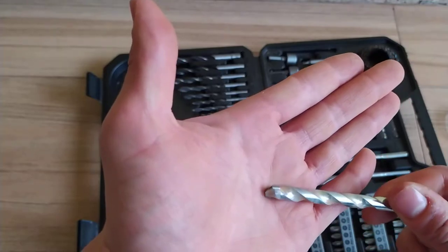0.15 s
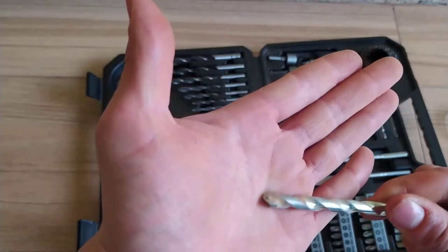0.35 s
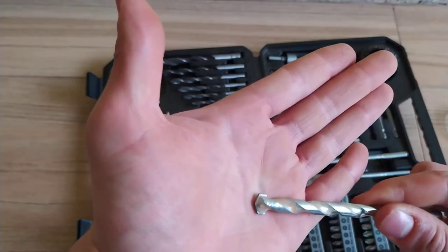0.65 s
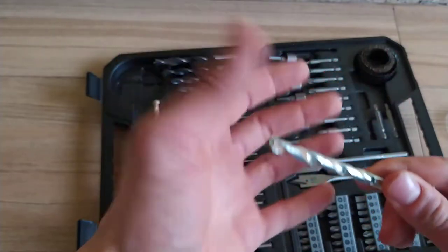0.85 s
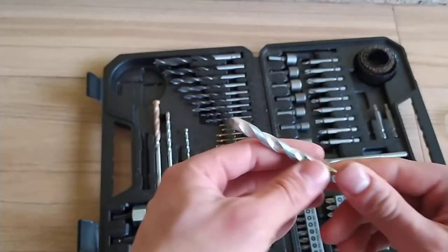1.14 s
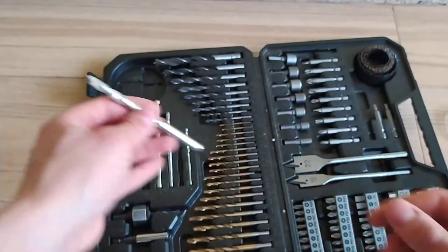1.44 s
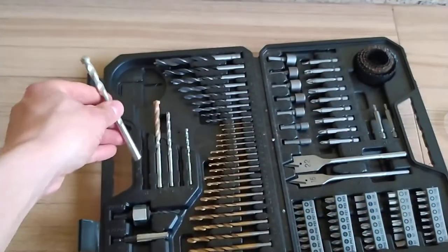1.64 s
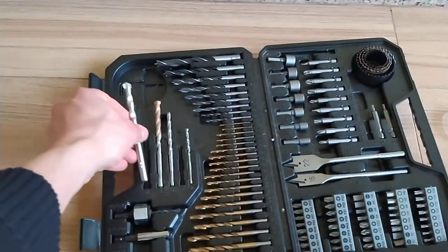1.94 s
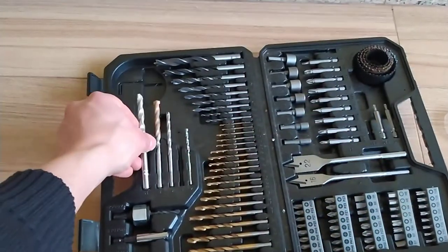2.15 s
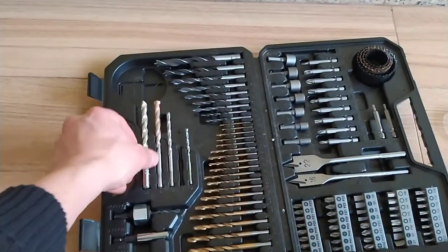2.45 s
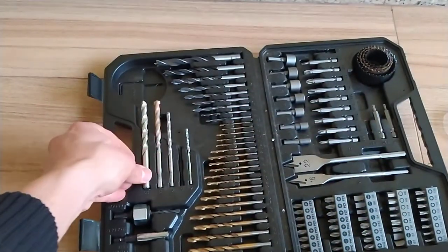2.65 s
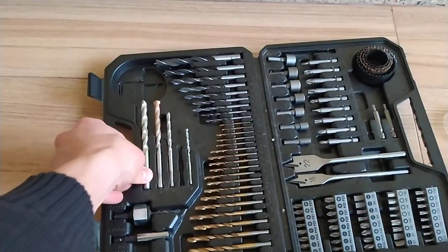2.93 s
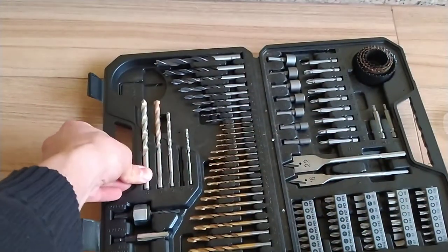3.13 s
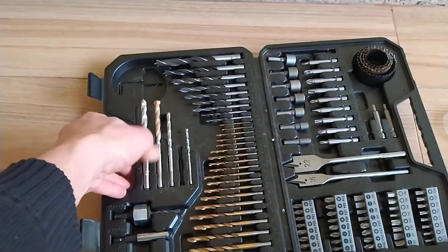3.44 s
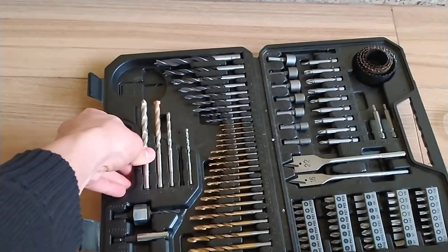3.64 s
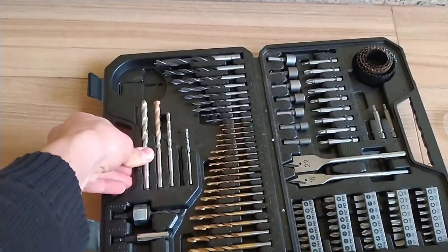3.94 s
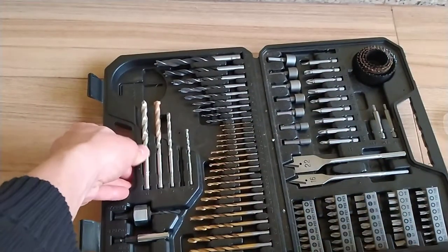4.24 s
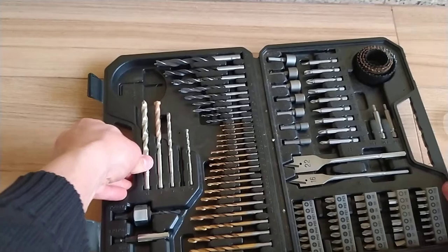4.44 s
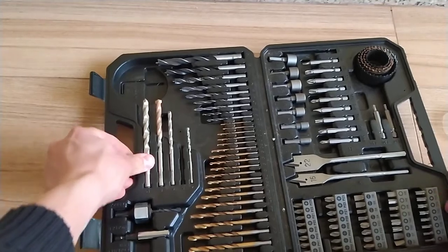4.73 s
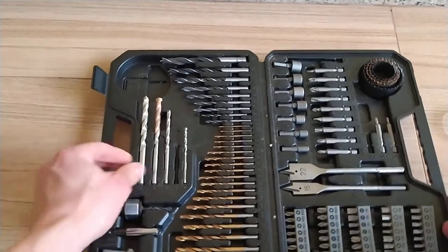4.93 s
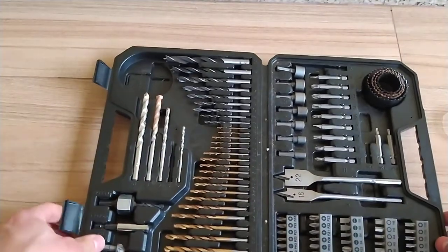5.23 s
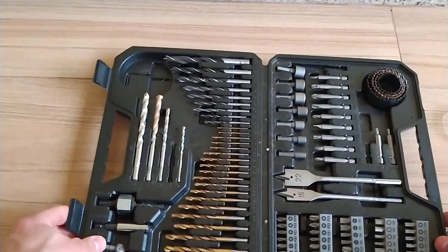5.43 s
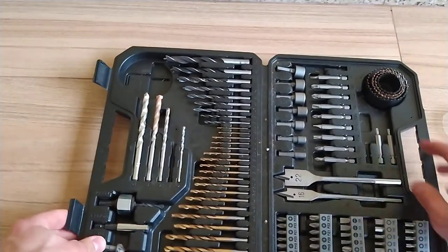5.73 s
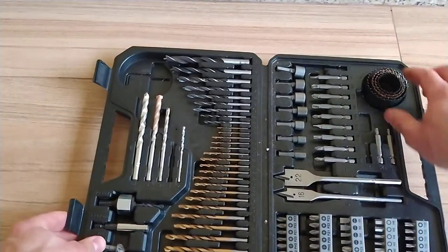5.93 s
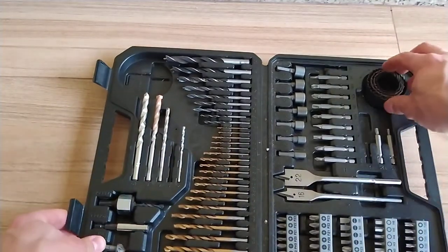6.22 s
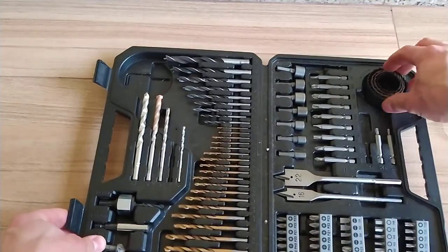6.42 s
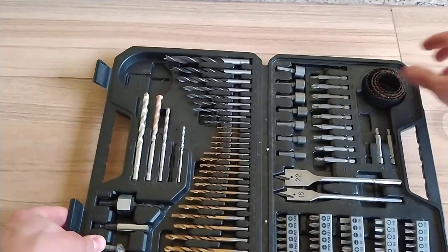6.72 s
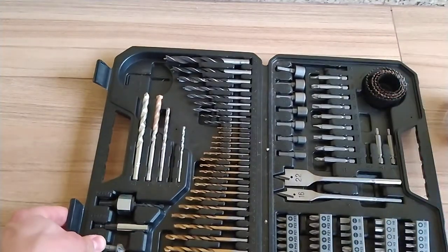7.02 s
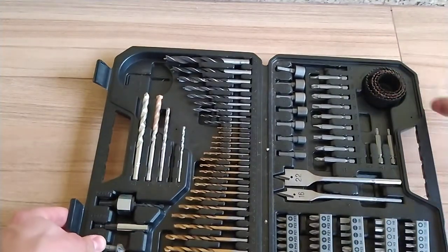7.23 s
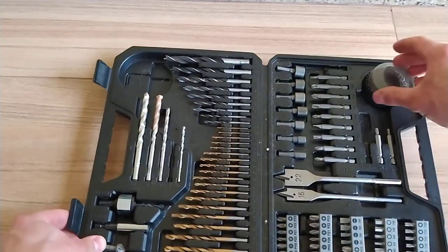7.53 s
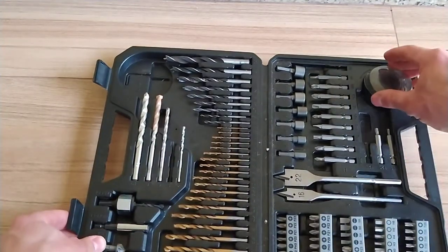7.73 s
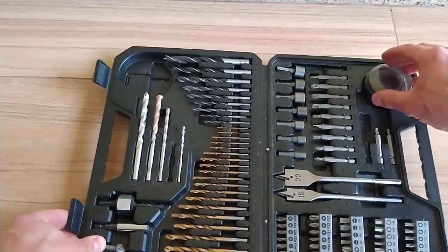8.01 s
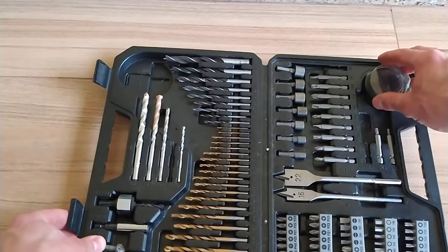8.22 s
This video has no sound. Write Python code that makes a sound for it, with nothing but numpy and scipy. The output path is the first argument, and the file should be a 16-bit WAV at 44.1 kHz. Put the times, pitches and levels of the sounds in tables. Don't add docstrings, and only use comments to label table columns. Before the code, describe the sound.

Quiet room hum, faint finger rubbing, two hollow knocks, one sharp plastic snap, a short drag with nail ticks, then small cap clicks.

```python
import sys
import numpy as np
from scipy import signal
from scipy.fft import rfft, irfft, next_fast_len
from scipy.io import wavfile

SR = 44100
rng = np.random.default_rng(int(sys.argv[2]) if len(sys.argv) > 2 else 0)


def invert_db(x):
    u = np.asarray(x, float) / 20
    return 10 ** u


def transcribe(signal):
    frames = np.atleast_2d(signal).T
    limited = np.clip(frames, -1, 1)
    pcm = np.round(limited * 32767).astype(np.int16)
    wavfile.write(sys.argv[1], SR, pcm)


N = 369116

# freq_hz, density_db_per_hz
HUM_SPECTRUM = [(12, -25), (20, 0), (40, -5), (65, -7), (105, -13), (157, -8), (200, -16), (250, -8),
                (295, -17), (345, -14), (480, -21), (770, -27), (1500, -36), (2500, -60)]
# freq_hz, density_db_per_hz
HISS_SPECTRUM = [(700, -1.5), (1400, -1.5), (2300, -1), (4300, -7.5), (5400, -7.5), (5850, 3), (6300, -5.5),
                 (7600, -9), (9500, -3), (11000, -6.5), (12000, -15), (15500, -15.5), (16500, -49.5)]
# freq_hz, likeness (-1..1)
PORT_LIKENESS = [(60, 0.7), (180, 0.98), (550, 0.4), (1650, -0.41), (4970, 0.038), (15000, -0.066)]
HUM_DB, HISS_DB, HUM_PAN_DB = -54.5, -67.5, 1.3

# start_s, length_s, hiss_db, scrape_db
STROKES = [(.75, 0.73, -67.5, -85), (2.23, 0.51, -63, -64), (2.77, 0.11, -56.5, -64.5),
           (3.297, 0.25, -59, -68.5), (3.455, 0.026, -48, -73), (3.779, 0.16, -65.5, -69),
           (4.159, 0.11, -57, -65.5), (4.246, 0.067, -55, -60), (4.604, 0.12, -46.5, -55.5),
           (4.7, 0.065, -52, -62.5), (4.768, 0.42, -38, -49), (5.24, 0.2, -60, -65),
           (5.536, 0.3, -61, -70.5), (5.795, 0.13, -53, -66), (6.216, 0.11, -47.5, -52),
           (6.348, 0.044, -56, -60), (6.411, 0.17, -46.5, -58.5), (6.646, 0.063, -55.5, -66.5),
           (7.029, 0.06, -58, -82), (7.553, 0.098, -63, -68.5), (7.868, 0.13, -61, -59),
           (8.027, 0.19, -83, -63.5), (8.173, 0.23, -61, -62.5)]
# time_s, left_minus_right_db
STROKE_PAN = [(0, -2.5), (4, 0.5), (4.7, 1), (5.2, 1.5), (5.8, 2), (6.3, 1.5), (6.6, 1.5), (7.5, -1),
              (8.3, 4.5)]
# freq_hz, density_db_per_hz
BRIGHT_SPECTRUM = [(2000, -38), (3500, -10.5), (5300, -8.5), (6500, -8.5), (8500, -1.5), (10400, -0.5),
                   (11500, -7), (12500, -15.5), (15000, -14.5), (16500, -38.5)]
# freq_hz, density_db_per_hz
CASE_SCRAPE_SPECTRUM = [(150, -45.5), (250, -24), (347, -16), (529, -15), (1130, -14), (1310, -15.5),
                        (2400, -15), (4500, -29.5), (5850, -50), (9900, -120)]
# freq_hz, density_db_per_hz
CAP_SCRAPE_SPECTRUM = [(700, -4), (1050, -3.5), (1250, 5), (1450, 3), (1700, -4), (2100, -16), (2600, -10),
                       (5000, -38.5)]
PRESS_SHARE, RELEASE_SHARE, LIGHT_DB = 0.17, 0.28, -21.5
FIDGET_FROM_S, FIDGET_HISS_DB, FIDGET_SCRAPE_DB = 1.7, -71, -77.5
CAP_FROM_S, CONTROL_STEP_SAMPLES = 7.04, 32

# time_s, wall_db, crack_db, left_minus_right_db
TICKS = [(1.529, -62.5, -63, -2), (2.802, -75, -58, 5), (2.812, -73, -51, 7), (3.463, -77, -49.5, 17),
         (3.584, -63.5, -62, -2.5), (4.259, -76, -54, -3), (4.869, -45, -31.5, -3.5), (5.125, -53, -41, 0),
         (5.28, -66, -58, -2), (6.122, -51, -60.5, -3), (6.212, -79, -55, 8.5), (6.233, -56, -44, 2),
         (6.247, -59, -48, 5), (6.253, -63, -42.5, -2), (6.285, -68, -59, -3), (6.372, -70, -52, -5),
         (6.415, -76, -53, 0), (6.483, -50, -33.5, 5), (6.498, -64, -50, 0), (6.612, -59.5, -49.5, 15),
         (6.706, -68, -55, 2)]
# time_s, level_db, left_minus_right_db
PLUCKS = [(4.259, -50, -21), (4.272, -58, -10), (6.123, -49.5, 3), (6.247, -44, 13), (6.285, -50, -1),
          (6.46, -49, 1)]
# time_s, level_db, left_minus_right_db
DRAG_SLIPS = [(4.955, -46, -1), (4.985, -59, -3), (5.03, -53, 0), (5.065, -53, -3), (5.1, -57, -3)]
# time_s, level_db, left_minus_right_db
FLICKS = [(5.2095, -36, 3), (5.2115, -41, 0), (6.4835, -44, 1), (6.6135, -54, 5), (7.9235, -50, 3)]
# freq_hz, density_db_per_hz
FLICK_SPECTRUM = [(800, -14), (2000, -5), (6000, -9), (9000, -3), (12000, 0), (16000, 7), (17200, -40)]
# freq_hz, density_db_per_hz
SHARP_SPECTRUM = [(2000, -47), (3500, -21), (5300, -9), (6500, -12.5), (8500, -0.5), (10400, -0.5),
                  (11500, -11), (12500, -15.5), (15000, -12), (16600, -19), (17200, -42.5)]
# freq_hz, density_db_per_hz
WALL_SPECTRUM = [(400, -32), (800, -3), (1200, -1.5), (2000, 2), (2600, 0), (3500, -7), (5000, -16.5),
                 (7000, -34.5)]
# freq_hz, level_db, t60_s
CLIP_MODES = [(870, -10, 0.02), (1150, -2.5, 0.031), (1430, -5, .03)]
TICK_T60_S, CRACK_RISE_S = 0.012, 0.0004

# time_s, shell_db, panel_db, wall_db, crack_db
KNOCKS = [(1.9909, -41.5, -44, -33.5, -46.5), (1.997, -40.5, -38, -60, -64), (2.008, -49, -46.5, -62, -58),
          (2.029, -48, -42.5, -57, -53), (2.045, -42, -46.5, -67, -60), (2.055, -41.5, -49.5, -64, -57),
          (2.1663, -41, -39, -54, -53.5), (2.184, -48.5, -45.5, -75, -74),
          (2.322, -44.5, -56, -36.5, -29.5), (2.3265, -21, -33.5, -30.5, -41),
          (2.331, -45, -36.5, -37, -50), (2.3575, -32, -38, -42.5, -67.5), (2.384, -55.5, -37.5, -57, -65),
          (2.4057, -36.5, -53, -60, -70)]
# time_s, level_db, left_minus_right_db
THUDS = [
    (2.045, -50, 0),
    (2.075, -49, 0),
    (2.172, -52.5, 0),
    (2.36, -47.5, 0),
]
# freq_hz, level_db, t60_s
SHELL_MODES = [(200, -15.5, 0.058), (231, -10.5, 0.08), (283, -4, 0.13), (324.2, -4, 0.51),
               (335, -3.5, 0.15), (370, -19, 0.027), (415, -20.5, .05)]
# freq_hz, level_db, t60_s
PANEL_MODES = [(465, -4.5, 0.084), (510, -9, .08), (611, 4.5, 0.05), (702, 0, 0.017), (743, -3, 0.035),
               (810, -19, 0.019), (990, -0.5, 0.034), (1106, -6.5, 0.065)]
# freq_hz, level_db, t60_s
HELD_BIT_MODES = [(1465, 4.5, 0.0064), (3070, -3, 0.018)]
# freq_hz, level_db, t60_s
BOARD_MODES = [(135, 5.5, 0.14), (165, -7, 0.057)]
# freq_hz, density_db_per_hz
RATTLE_SPECTRUM = [(2000, -37.5), (3500, -15), (5300, -4.5), (6500, -8.5), (8500, -2.5), (10600, -9),
                   (11400, -9), (12300, -26)]
KNOCK_PAN_DB, SHELL_LAG_S = 0.5, 0.00247

# time_s, body_db, wall_db, crack_db, left_minus_right_db
SNAP = [
    (2.9952, -60, -45, -44, -6),
    (2.9961, -39, -17, -10, 2.5),
    (2.9971, -42, -26.5, -19.5, 3.5),
    (2.9985, -36.5, -34, -24, -4.5),
    (3.001, -31, -27, -21.5, 0.5),
    (3.011, -33, -52.5, -25.5, -5.5),
    (3.015, -43, -47, -30.5, 2),
    (3.022, -36.5, -41, -35.5, -15.5),
]
# time_s, level_db, left_minus_right_db
STEEL_BLOWS = [
    (2.9965, -23, -12),
    (3.002, -46, 1.5),
]
# freq_hz, level_db, t60_s
DAMPED_SHELL_MODES = [(185, -3, 0.18), (279, -10.5, 0.073), (337, 2, 0.069), (420, 0, 0.12),
                      (458, -3.5, 0.077), (604, 7, 0.032), (687, 0, 0.037), (761, 2, 0.027),
                      (816, -4, 0.05), (920, -7, 0.025), (1054, 0, .03)]
# freq_hz, level_db, t60_s
STEEL_MODES = [(2110, -15, .04), (2345, 6, .04), (5230, -3, 0.0442), (4900, -7, 0.054), (6250, -1, 0.054),
               (8400, -12, 0.067), (9400, -1.5, 0.0825), (9555, -6.5, 0.086)]

# time_s, level_db, left_minus_right_db
CAP_LIFT = [(7.045, -51, 4), (7.051, -54, 7), (7.058, -56, -11), (7.066, -57.5, 0), (7.075, -55.5, 5),
            (7.084, -61, -1)]
# time_s, hollow_db, wall_db, crack_db, left_minus_right_db
CAP_HITS = [(7.592, -72, -73, -58, 0), (7.6295, -45, -52, -70, 5), (7.638, -42.5, -58, -61, 1),
            (7.645, -55, -50, -39.5, 17), (7.6505, -40, -40.5, -36, 2), (7.656, -58, -47, -48, 0),
            (7.7235, -47, -62, -55, 1), (7.783, -64, -75, -68, 4), (7.882, -58, -76, -64, 2),
            (7.89, -66, -72, -54, 3), (7.912, -57, -64, -62, 1), (7.923, -55, -64, -43.5, 3),
            (7.928, -56, -67, -50, 0), (7.954, -57, -58, -52, 0), (7.998, -57, -56, -45, 14),
            (8.011, -49, -58, -52, 0), (8.031, -58, -46.5, -30, -15), (8.047, -69, -51, -41, 13),
            (8.085, -57, -56, -54, 9), (8.114, -58, -66, -64, 3), (8.212, -54, -59, -52, 1),
            (8.35, -45.5, -47, -30.5, 3), (8.358, -62, -64, -48, 4), (8.365, -57, -68, -36, 8)]
# time_s, level_db, left_minus_right_db
CAP_SEATING = [
    (8.0315, -34, 4),
    (8.033, -48, -1),
    (8.047, -55, 6),
    (8.35, -55, 5),
]
# freq_hz, level_db, t60_s
OPEN_CAP_MODES = [(1114, -3, 0.043), (1470, 9.5, 0.016), (1730, 5.5, 0.038), (1970, 8, 0.041)]
# freq_hz, level_db, t60_s
CAP_MODES = [(892, -11.5, 0.1), (1100, -8, 0.018), (1355, -7, 0.016), (1490, 2, 0.035), (1550, 3, 0.039),
             (1690, 1, 0.019), (1960, -6, 0.047), (3640, -19, 0.012), (5150, -21, 0.011)]
# freq_hz, level_db, t60_s
RIM_MODES = [(1210, 3, 0.017), (1570, -13, 0.022), (2540, 2, 0.015), (3380, -4, 0.029), (3730, 3, 0.022),
             (4080, -8, 0.071), (5380, -1, 0.016), (11150, -2, .04)]

# freq_hz, t60_s
ROOM_T60 = [(150, 1), (500, 0.71), (2000, 0.53), (6000, 0.54), (9500, 0.43), (12000, 0.3)]
ROOM_DB, PORT_LAG_S = -7.5, 0.0001


def at_hz(points, hz):
    table_hz, values = np.transpose(points)
    return np.interp(np.log(hz + 1), np.log(table_hz + 1), values)


def pan(db):
    return invert_db(np.array([db / 2, -db / 2, 0 * db]))


def blend(mid, side, alike):
    return np.sqrt(1 + alike) * mid + np.sqrt(1 - alike) * side * [[1], [-1]]


def steady(spectrum, level_db):
    size = next_fast_len(N)
    hz = np.linspace(0, SR / 2, size // 2 + 1)
    mid, side = rfft(rng.standard_normal((2, size)))
    both = blend(mid, side, np.clip(at_hz(PORT_LIKENESS, hz), -0.99, 0.99))
    out = irfft(both * invert_db(at_hz(spectrum, hz)) * (hz > 12), size)[:, :N]
    return invert_db(level_db) * out / np.std(out.mean(axis=0))


def hum():
    return steady(HUM_SPECTRUM, HUM_DB) * pan(HUM_PAN_DB)[:2, None] + steady(HISS_SPECTRUM, HISS_DB)


def colour(x, spectrum):
    cepstrum = irfft(at_hz(spectrum, np.linspace(0, SR / 2, 2049)) * np.log(10) / 20)
    cepstrum[1:2048] *= 2
    cepstrum[2049:] = 0
    taps = irfft(np.exp(rfft(cepstrum)))
    taps = taps[None, :1024] / np.linalg.norm(taps)
    return signal.oaconvolve(x, taps, axes=1)[:, :N]


def stroke_force(column, rest_db):
    t = np.arange(0, N + CONTROL_STEP_SAMPLES, CONTROL_STEP_SAMPLES) / SR
    power = invert_db(rest_db) ** 2 * (t > FIDGET_FROM_S)
    for row in STROKES:
        along = (t - row[0]) / row[1]
        pressure = np.minimum(along / PRESS_SHARE, (1 - along) / RELEASE_SHARE)
        pressure = np.clip(pressure, -3, 1)
        power = power + invert_db(row[column] + LIGHT_DB * (1 - pressure)) ** 2
    gains = np.sqrt(power) * pan(np.interp(t, *np.transpose(STROKE_PAN)))
    return np.repeat(gains, CONTROL_STEP_SAMPLES, axis=1)[:, :N]


def rubbing():
    t = np.arange(N) / SR
    knots = N // 300 + 2
    clumps = np.interp(np.arange(N) / 300, np.arange(knots), rng.standard_normal(knots))
    slip_db = 1.86 * np.minimum(rng.exponential(1, N), 4) + 1.2 * clumps
    slips = rng.standard_normal((3, N)) * invert_db(slip_db)
    slips = slips / np.sqrt(np.mean(slips ** 2) + 1e-20)
    slips = slips * invert_db([[0], [0], [-5]])
    mixed = 0.92 * slips[2] + 0.34 * slips * [[1], [1], [0]]
    shared = stroke_force(column=3, rest_db=FIDGET_SCRAPE_DB) * mixed
    on_case = colour(shared * (t < CAP_FROM_S), CASE_SCRAPE_SPECTRUM)
    in_cap = colour(shared * (t >= CAP_FROM_S), CAP_SCRAPE_SPECTRUM)
    hiss = colour(slips * stroke_force(column=2, rest_db=FIDGET_HISS_DB), BRIGHT_SPECTRUM)
    return hiss + invert_db(8.5) * (on_case + in_cap)


def ring(clicks, hz, t60_s):
    r = invert_db(-60 / (t60_s * SR))
    w = 2 * np.pi * hz / SR
    return signal.lfilter([0, np.sin(w)], [1, -2 * r * np.cos(w), r * r], clicks + 1e-18)


def struck(rows, column, modes, spread_db, contact_s):
    rows, out = np.array(rows), np.zeros((3, N))
    for hz, level_db, t60_s in modes:
        draw, clicks = rng.standard_normal((len(rows), 2)), np.zeros((3, N + 999))
        at = (rows[:, 0] * SR + np.abs(draw[:, 1]) * contact_s * SR).astype(int)
        hit_db = rows[:, column] + level_db + spread_db * draw[:, 0]
        clicks[:, at] = invert_db(hit_db) * pan(rows[:, -1])
        span = slice(at.min(), min(N, at.max() + int(2 * t60_s * SR)))
        out[:, span] += ring(clicks[:, span], hz, t60_s)
    return out


def cracks(rows, column, spectrum, t60_s, gain_db, alike):
    size = 3000
    out, t = np.zeros((3, N + size)), np.arange(size) / SR
    shape = invert_db(-60 * t / t60_s) * np.clip(t / CRACK_RISE_S, 0, 1)
    for row in rows:
        common, own = rng.laplace(size=size), rng.laplace(size=(3, size))
        spray = (alike * common + (1 - alike) * own) * shape
        spray[2] = (t == 0) * np.linalg.norm(spray[:2]) / np.sqrt(2)
        at = round(row[0] * SR)
        out[:, at:at + size] += invert_db(row[column] + gain_db) * pan(row[-1])[:, None] * spray
    return colour(out[:, :N], spectrum)


def ticks():
    wall = cracks(TICKS, column=1, spectrum=WALL_SPECTRUM, t60_s=0.033, gain_db=2.5, alike=0.66)
    flick = cracks(FLICKS, column=1, spectrum=FLICK_SPECTRUM, t60_s=0.006, gain_db=5, alike=0.7)
    drag = struck(DRAG_SLIPS, column=1, modes=SHELL_MODES, spread_db=3, contact_s=0.0035)
    pluck = struck(PLUCKS, column=1, modes=CLIP_MODES, spread_db=3, contact_s=0.00106)
    crack = cracks(TICKS, column=2, spectrum=SHARP_SPECTRUM, t60_s=TICK_T60_S, gain_db=7, alike=0.48)
    return wall + flick + drag + pluck + crack


def knocks():
    rows = [(*row, KNOCK_PAN_DB) for row in KNOCKS]
    late = [(row[0] + SHELL_LAG_S, *row[1:]) for row in rows]
    bit = struck(rows, column=3, modes=HELD_BIT_MODES, spread_db=3, contact_s=0.0007)
    shell = struck(late, column=1, modes=SHELL_MODES, spread_db=3, contact_s=0)
    shell = shell * invert_db([[0], [0], [-6]])
    panel = struck(rows, column=2, modes=PANEL_MODES, spread_db=0, contact_s=0.00204)
    wall = cracks(rows, column=3, spectrum=WALL_SPECTRUM, t60_s=0.067, gain_db=3.5, alike=0.38)
    rock = struck(THUDS, column=1, modes=BOARD_MODES, spread_db=3, contact_s=0.0013)
    crack = cracks(rows, column=4, spectrum=RATTLE_SPECTRUM, t60_s=0.06, gain_db=-0.5, alike=0.17)
    return rock + bit + shell + panel + wall + crack


def snap():
    body = struck(SNAP, column=1, modes=DAMPED_SHELL_MODES, spread_db=3, contact_s=0.00067)
    steel = struck(STEEL_BLOWS, column=1, modes=STEEL_MODES, spread_db=3, contact_s=0)
    wall = cracks(SNAP, column=2, spectrum=WALL_SPECTRUM, t60_s=0.022, gain_db=7, alike=0.71)
    crack = cracks(SNAP[:3], column=3, spectrum=BRIGHT_SPECTRUM, t60_s=0.0043, gain_db=11.5, alike=0.296)
    bounce = cracks(SNAP[3:], column=3, spectrum=RATTLE_SPECTRUM, t60_s=0.017, gain_db=6, alike=0.1)
    return body + steel + (wall + crack + bounce) * invert_db([[0], [0], [-0.8]])


def cap():
    lifted = struck(CAP_LIFT, column=1, modes=OPEN_CAP_MODES, spread_db=3, contact_s=0.00063)
    hollow = invert_db(1.5) * struck(CAP_HITS, column=1, modes=CAP_MODES, spread_db=0, contact_s=0.00113)
    wall = cracks(CAP_HITS, column=2, spectrum=WALL_SPECTRUM, t60_s=0.041, gain_db=1, alike=0.6)
    rim = struck(CAP_SEATING, column=1, modes=RIM_MODES, spread_db=3, contact_s=0.00048)
    crack = cracks(CAP_HITS, column=3, spectrum=SHARP_SPECTRUM, t60_s=TICK_T60_S, gain_db=6, alike=0.65)
    return rim + lifted + hollow + wall + crack


def room(sent):
    t, tail = np.arange(SR) / SR, 0
    white = rng.standard_normal((2, 2, SR))
    for k, low_hz in enumerate(100 * 2 ** np.arange(0, 7.1, 0.5)):
        band = signal.butter(2, [low_hz, low_hz * np.sqrt(2)], "band", fs=SR, output="sos")
        mid, side = signal.sosfilt(band, white[k % 2])
        both = blend(mid, side, np.clip(at_hz(PORT_LIKENESS, low_hz), 0, 0.99))
        tail = tail + both * invert_db(-60 * t / at_hz(ROOM_T60, low_hz))
    tail = tail * np.clip((t - 0.003) / 0.0099, 0, 1)
    furnishings = signal.butter(14, 11300, fs=SR, output="sos")
    tail = signal.sosfilt(furnishings, tail)
    tail = tail / np.sqrt(np.sum(tail ** 2) / 2)
    return invert_db(ROOM_DB) * signal.fftconvolve(sent[None], tail, axes=1)[:, :N]


def scene():
    near = rubbing() + ticks() + knocks() + snap() + cap()
    small_case = signal.butter(4, 135, "high", fs=SR, output="sos")
    left, right, sent = signal.sosfilt(small_case, near)
    left = np.interp(np.arange(N) - PORT_LAG_S * SR, np.arange(N), left)
    return np.array([left, right]) + room(sent) + hum()


def low_pass(x):
    return signal.sosfilt(signal.butter(12, 16920, fs=SR, output="sos"), x)


def record(dry):
    clipped = np.clip(dry, -0.72, 0.72)
    top_cut = signal.cheby2(10, 60, 16800, fs=SR, output="sos")
    return low_pass(signal.sosfilt(top_cut, clipped))


dry = scene()
out = record(dry)
transcribe(out)
```